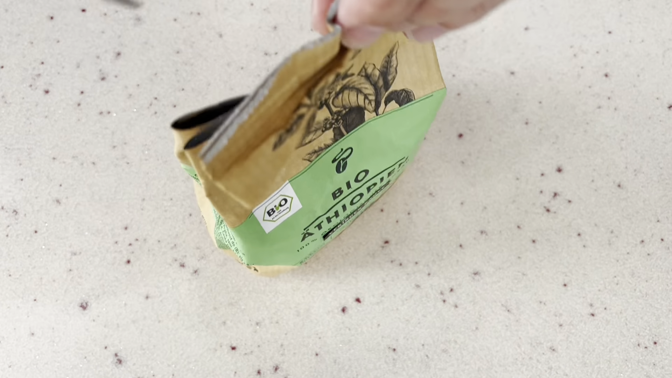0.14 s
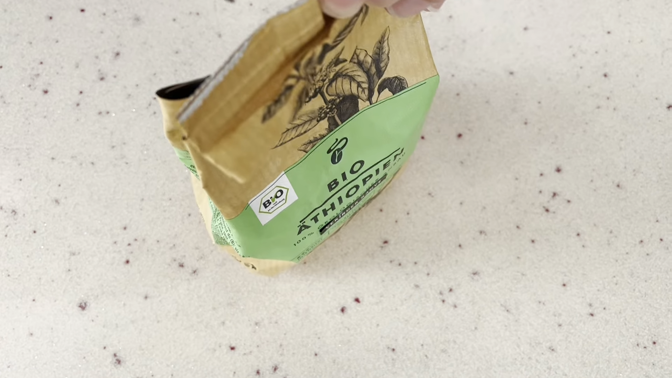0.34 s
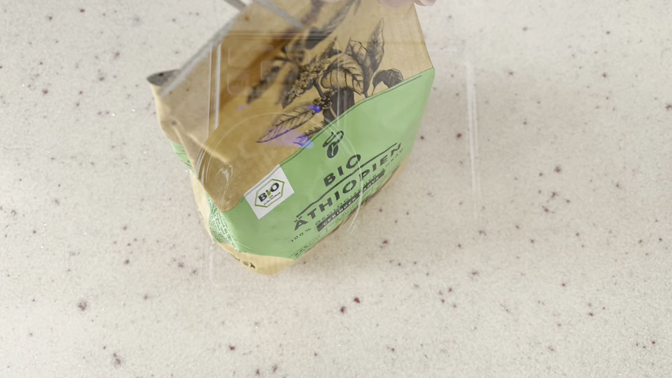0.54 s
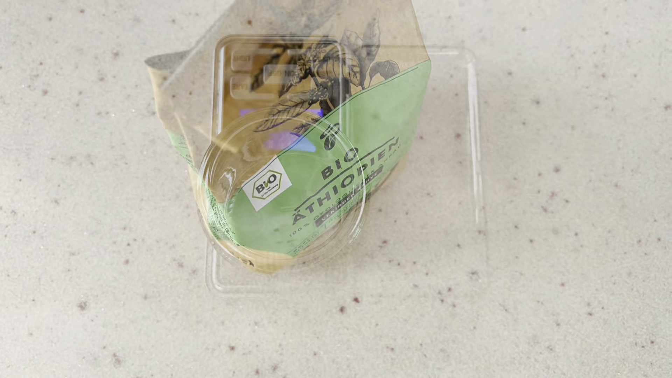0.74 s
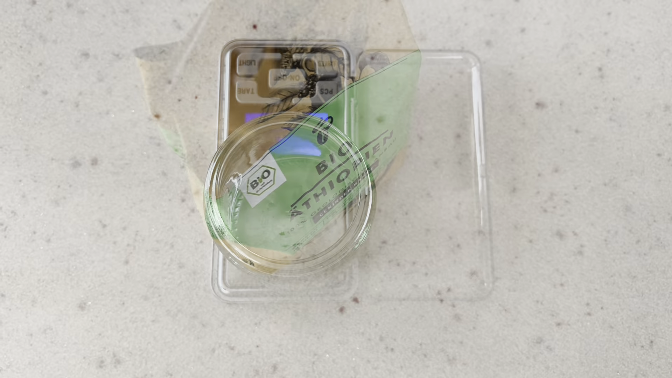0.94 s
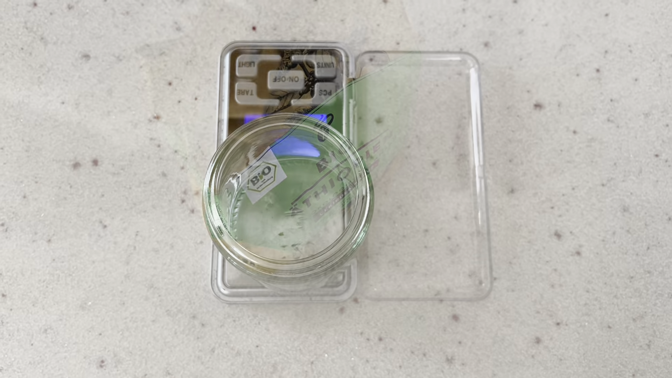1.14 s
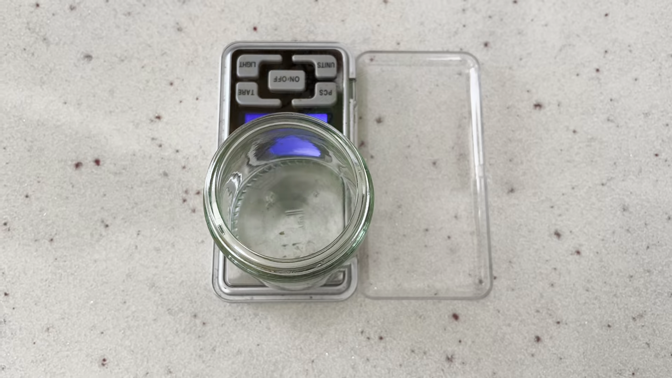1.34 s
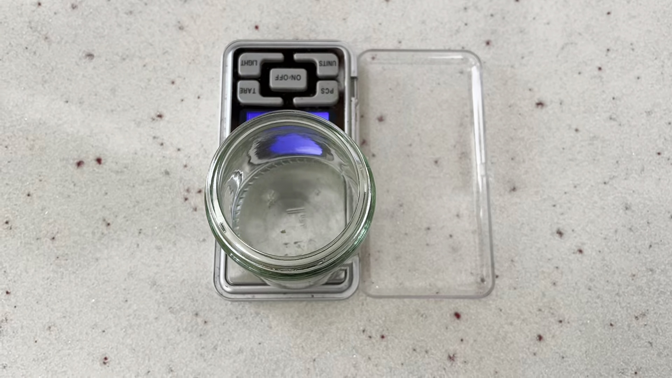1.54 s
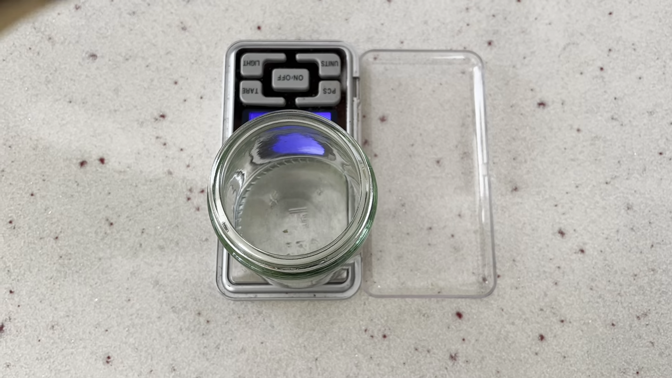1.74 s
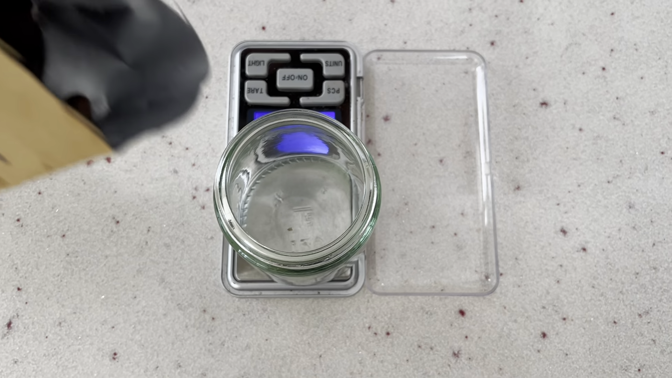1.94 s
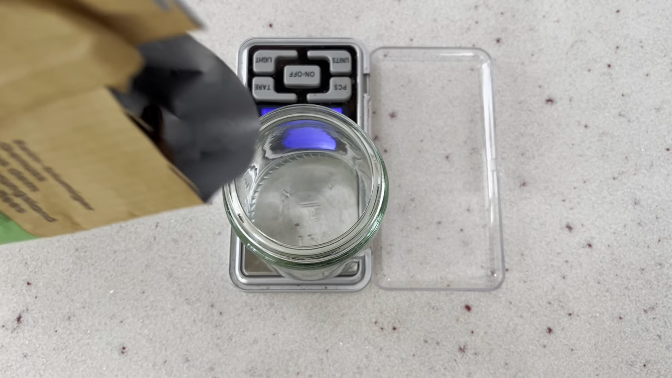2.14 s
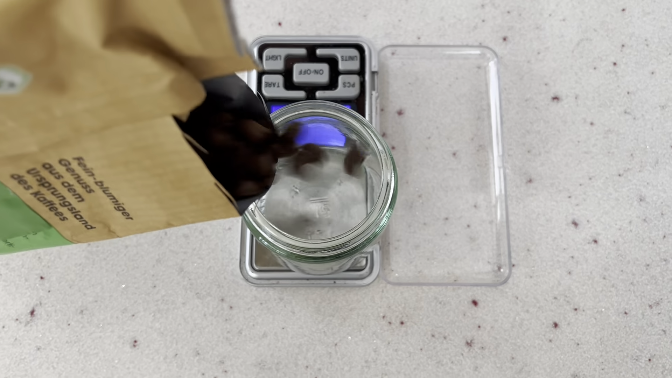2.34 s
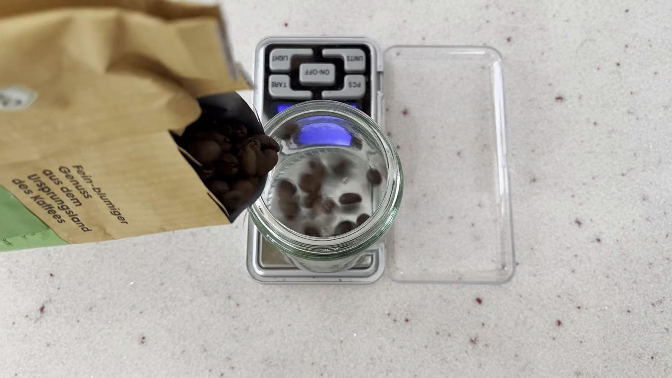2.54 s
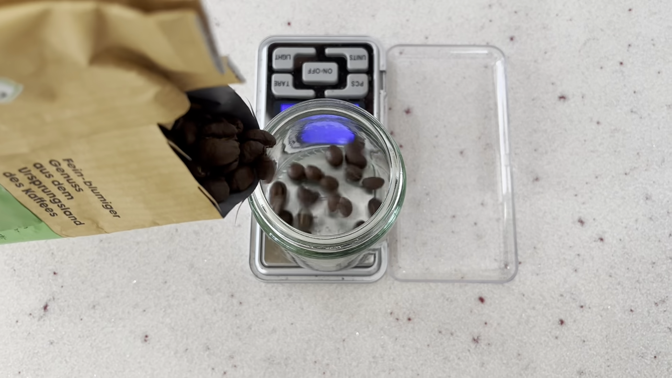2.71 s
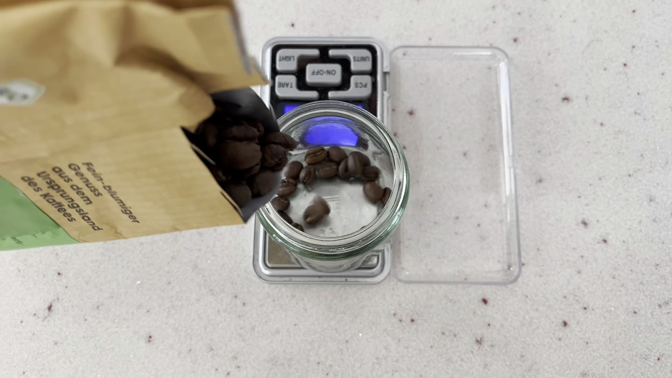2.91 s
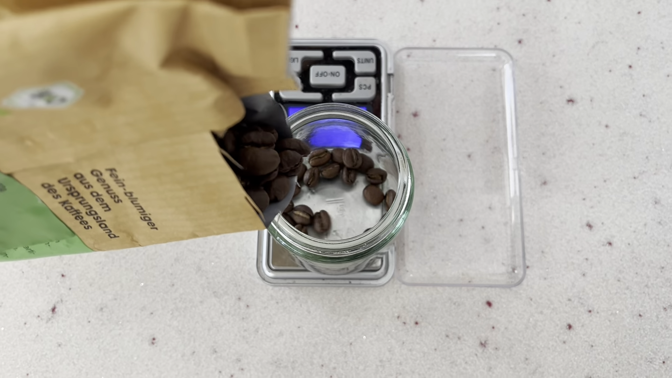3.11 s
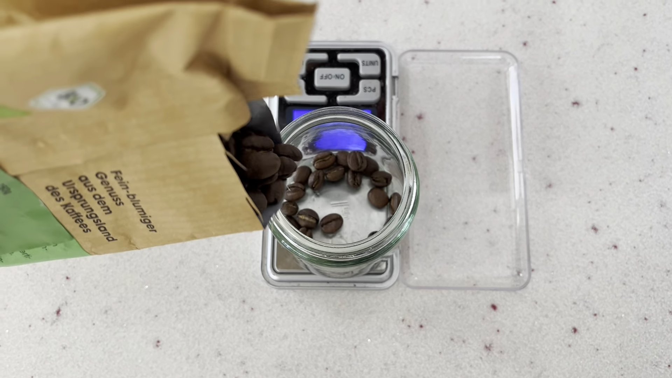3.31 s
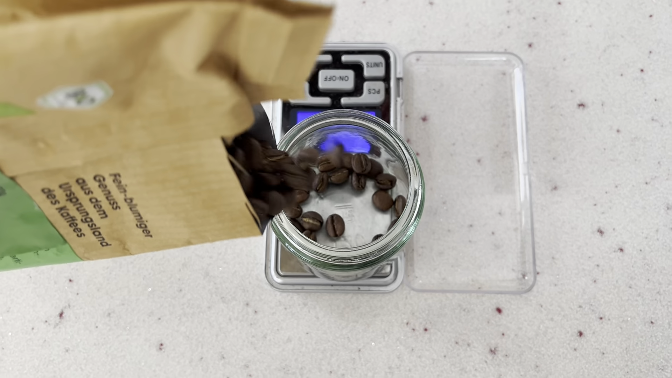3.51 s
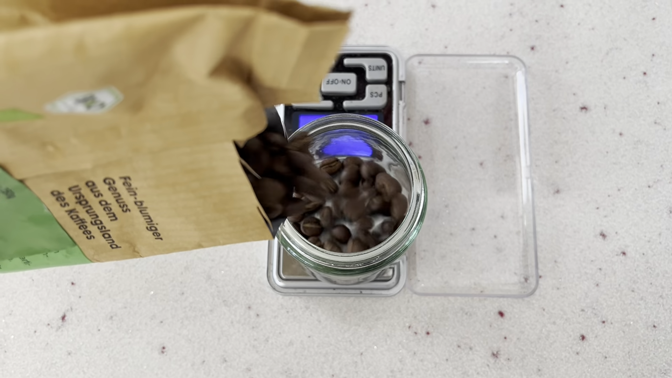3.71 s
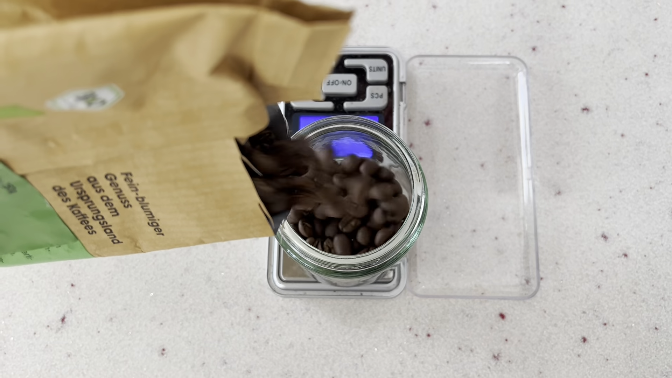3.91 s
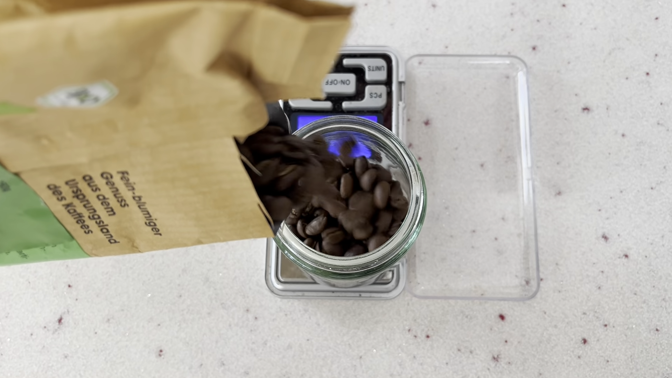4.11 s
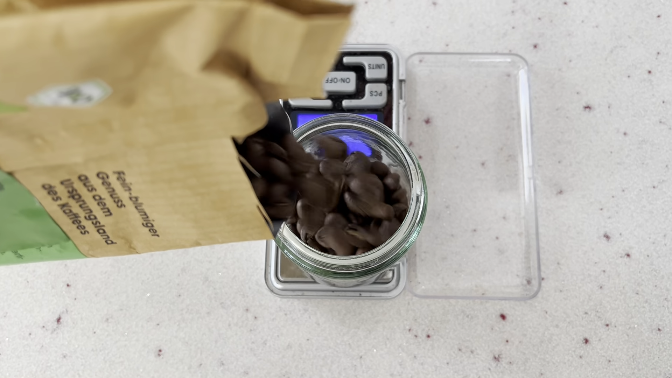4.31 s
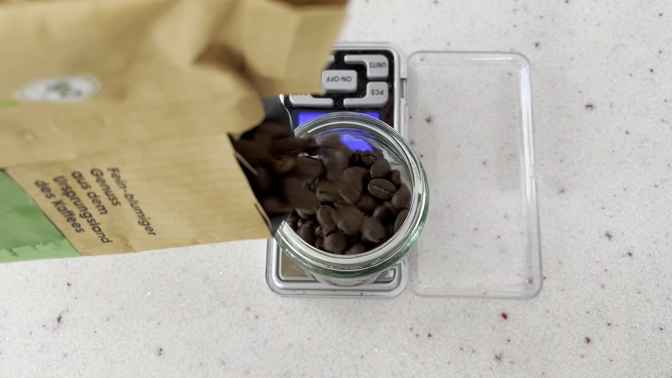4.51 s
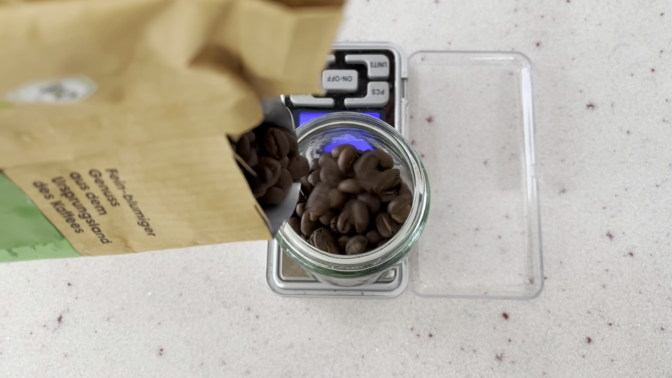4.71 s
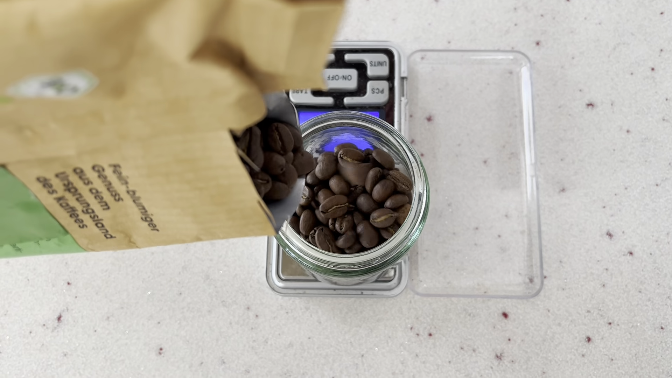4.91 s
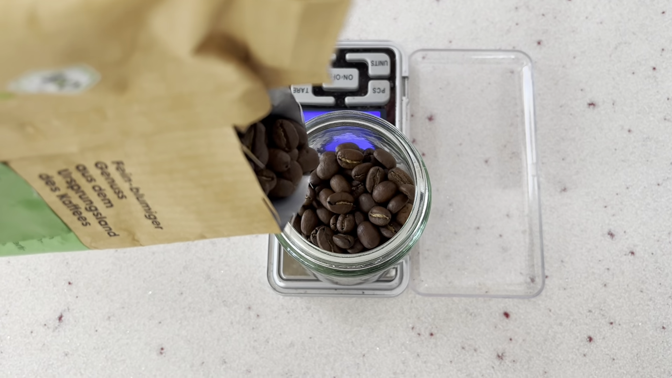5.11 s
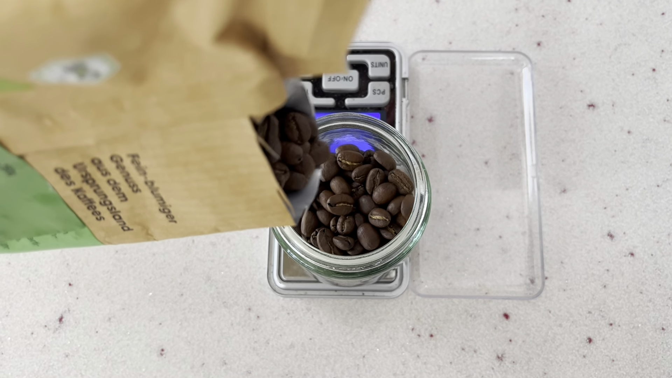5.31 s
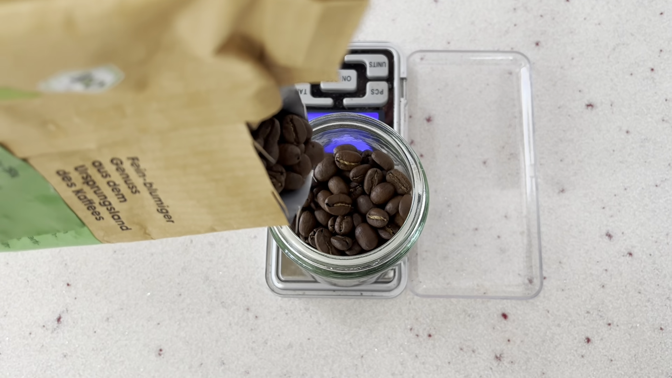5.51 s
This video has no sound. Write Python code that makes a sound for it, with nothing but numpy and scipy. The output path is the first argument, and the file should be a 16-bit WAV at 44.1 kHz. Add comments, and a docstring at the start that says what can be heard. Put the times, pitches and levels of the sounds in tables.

```python
"""Coffee beans into a glass jar

A paper bag of roasted beans is handled, lifted and tipped twice over a small jar, close to a stereo
microphone in a quiet kitchen. Paper crackles and slides in the bag are filtered noise and short ticks.
Beans landing are brittle clicks plus decaying modes of the glass; from about 4 s the heap covers the
glass, almost at once: the ring is choked and dry clicking is left. A short diffuse tail and a low
room tone surround it all.
"""
import sys
import numpy as np
from scipy import signal
from scipy.fft import rfft, irfft, next_fast_len
from scipy.io import wavfile
from scipy.ndimage import map_coordinates

SR = 44100
rng = np.random.default_rng(int(sys.argv[2]) if len(sys.argv) > 2 else 0)


def transcribe(u):
    """Save the signal u as a 16-bit wav file named by the first command-line argument.

    u: samples, shape (n,) or (channels, n), limited to [-1, 1]; the rate is SR.
    q: integer samples, one column per channel.
    """
    v = np.clip(np.atleast_2d(u).T, -1, 1)
    q = np.round(v * 32767).astype(np.int16)
    wavfile.write(sys.argv[1], SR, q)


N = 244755

# All levels and spectra below are relative: the sources and the mix set their own gains.
# hardest landings in the jar: start_s, click_level_db, glass_ring_level_db
LANDINGS = [(2.4069, -23.5, -24.5), (2.452, -16.5, -33), (2.4625, -19, -15), (2.4841, -12.5, -16),
            (2.5402, -13.5, -11.5), (2.5803, -21.5, -16), (2.642, -16.5, -17), (2.713, -25, -21),
            (2.7346, -23, -18), (2.759, -28, -19), (2.8529, -18.5, -13.5), (2.88, -28.5, -27),
            (2.9512, -27, -22), (3.01, -31.5, -28.5), (3.0512, -38, -31), (3.5575, -21.5, -19),
            (3.5811, -21.5, -20), (3.606, -18, -16.5), (3.6333, -17.5, -20), (3.642, -24.5, -10.5),
            (3.7148, -14.5, -17), (3.7417, -22.5, -13), (3.8195, -18, -17.5), (3.848, -15.5, -18.5),
            (3.8912, -25, -22), (3.9342, -19, -21.5), (3.9676, -20, -26), (4.0032, -21, -37),
            (4.0594, -16.5, -22), (4.1713, -24, -30.5), (4.2263, -21.5, -29.5), (4.261, -22.5, -41.5),
            (4.3079, -17, -48), (4.37, -16.5, -31), (4.5524, -19.5, -41), (4.6246, -19.5, -46),
            (4.6663, -29, -48.5), (4.7194, -22, -40), (4.785, -22.5, -61), (4.878, -42, -66),
            (4.9145, -31, -67), (4.9745, -30.5, -70), (5.0205, -37.5, -74)]
# beans striking the rim: start_s, ring_level_db
RIM_STRIKES = [(2.347, -36.5), (2.408, -37), (2.493, -45), (2.80, -50.5), (3.581, -45.5), (3.953, -47.5),
               (4.031, -44.5), (4.129, -41.5), (4.392, -40), (4.443, -39.5), (4.553, -45), (5.02, -56)]
# surges of beans falling into the jar: full_flow_s, rise_s, hold_s, t60_s, level_db
POURS = [(2.31, 0.11, 0.06, 0.25, -41), (2.48, 0.014, 0.31, .6, -46.5), (3.74, 0.11, 0.74, 0.24, -43.5),
         (4.62, 0.045, 0.092, 0.2, -46)]
# modes of the jar's bare wall: pitch_hz, level_db, t60_s
WALL_MODES = [(9077, 2, 0.12), (9000, -19.5, 0.043), (8840, -51, .04), (15400, -29, .02)]
# modes of the jar's rim: pitch_hz, level_db, t60_s
RIM_MODES = [(4243, 4, 0.15), (10500, -2, 0.15), (15530, -3, 0.087)]
# spectrum of bean clicks: frequency_hz, level_db_per_hz
BEAN_SPECTRUM = [(1000, -35), (3000, -11), (5000, -12), (6400, -16), (7500, -9.5), (9000, -5),
                 (11200, -1.5), (12000, -8), (12700, -11), (13800, -8), (15500, 5.5), (16100, -23),
                 (17000, -28.5)]
# slides in the bag: beans shifting as it is tipped, and a brief paper scuff at 0.85 s:
# full_flow_s, rise_s, hold_s, t60_s, level_db
SLIDES = [(0.14, 0.069, 0.1, 0.75, -58), (0.848, .016, .02, 0.18, -59), (1.43, 0.13, 0.048, 0.81, -36),
          (2.23, 0.16, 0.071, 1.0, -30), (3.68, 0.21, 1.03, .85, -44.5), (5.55, 0.021, 0.018, 0.25, -49.5)]
# spectrum of slides deep in the hollow bag: frequency_hz, level_db_per_hz
DEEP_SPECTRUM = [(50, -31.5), (130, -14.5), (290, -3), (420, -11.5), (680, -9.5), (930, -0.5), (1130, -0.5),
                 (1600, -8.5), (2500, -10), (4200, -14.5), (6400, -24), (10500, -17.5), (12800, -33.5),
                 (15500, -22)]
# spectrum of beans sliding out over the lip: frequency_hz, level_db_per_hz
LIP_SPECTRUM = [(50, -40), (160, -10), (330, 1), (470, -5), (720, -8), (1020, 3), (1550, -7), (2600, -10),
                (4200, -12), (5500, -15), (6500, -18.5), (11000, -21), (16000, -29)]
# creases of the bag snapping: start_s, peak_level_db, treble_level_db (against the peak)
SNAPS = [(0.0982, -37, -9), (0.1227, -28.5, 7.5), (0.1439, -32, -20), (0.192, -23.5, 2.5),
         (0.2274, -31, -2.5), (0.5709, -45.5, -25), (0.6581, -28, -12), (0.9674, -34.5, 3),
         (1.1129, -16, 6), (1.2527, -44, -14), (1.5594, -40, 7), (1.6518, -25.5, -12), (1.7324, -40.5, -3),
         (1.8295, -46.5, 9.5), (1.862, -39.5, 5), (1.911, -33.5, 9), (4.813, -24, 0)]
# fingers flexing the paper: full_grip_s, rise_s, hold_s, t60_s, level_db
GRIPS = [(0.02, 0.061, 0.28, .8, -66.5), (0.852, .018, .015, .2, -58), (0.965, 0.032, 0.026, .25, -59.5),
         (1.75, 0.062, 0.14, .3, -66), (2.04, 0.028, 0.016, 0.15, -52), (5.42, 0.16, 0.13, .3, -72)]
# clumps of beans bumping the bag wall: start_s, peak_level_db
BUMPS = [(1.112, -24), (1.335, -20), (1.42, -18), (1.456, -15), (1.497, -9), (1.522, -21), (1.996, -12),
         (2.163, -14), (4.876, -32), (4.915, -34), (5.392, -44)]
# dull knocks on the bag or the jar's stand: start_s, peak_level_db
THUDS = [(0.19, -52), (1.112, -42), (1.497, -30), (2.853, -29.5), (4.786, -34)]
# the bag's foot scraping the worktop: full_speed_s, rise_s, hold_s, t60_s, level_db
RUBS = [(0.66, .03, 0.066, 1, -59)]
# spectrum of crackling paper: frequency_hz, level_db_per_hz
PAPER_SPECTRUM = [(50, -57), (150, -1.5), (400, 0), (750, -3), (1300, 1), (2300, -3), (4800, -1.5),
                  (6400, -9.5), (8000, -1), (11000, -16.5), (12700, -19.5), (15000, -17.5), (17000, -45.5)]
# spectrum of a snap's sharp top: frequency_hz, level_db_per_hz
CREASE_SPECTRUM = [(2000, -18), (5000, -16), (8500, 2), (11000, 8.5), (12700, -14.5), (15000, 7.5),
                   (17000, -27)]
# spectrum of a bump: frequency_hz, level_db_per_hz
BUMP_SPECTRUM = [(50, -39.5), (130, -27.5), (300, -1), (650, -11), (950, 9.5), (1500, -1), (2500, -3.5),
                 (4500, -7.5), (7000, -15), (16000, -20)]
# spectrum of a thud: frequency_hz, level_db_per_hz
THUD_SPECTRUM = [(20, -32.5), (60, -11), (100, -1.5), (330, -2), (700, -12), (1300, -18), (3300, -10),
                 (6000, -22), (16000, -50)]
# spectrum of the scrape: frequency_hz, level_db_per_hz
RUB_SPECTRUM = [(200, -36), (390, -6), (450, 3.5), (520, -12.5), (850, -13), (1500, -26.5)]
# kitchen reverberation: frequency_hz, t60_s
KITCHEN_DECAY = [(200, 0.311), (2000, 0.15), (8000, 0.096), (15000, 0.015)]
# spectrum of the room tone: frequency_hz, level_db_per_hz
ROOM_SPECTRUM = [(15, -49.5), (28, -26.5), (48, -3.5), (70, -9), (104, -8), (135, -15.5), (290, -16.5),
                 (370, -26), (620, -26), (1030, -33), (2500, -42.5), (5000, -44.5), (10000, -62),
                 (13000, -76)]
# stereo balance of the bag: frequency_hz, left_minus_right_db
BAG_LEAN = [(100, -0.5), (380, 0.5), (700, 6), (1300, 3.5), (2400, 1), (4400, 3), (8000, -1)]
# stereo likeness of the bag: frequency_hz, left_right_likeness (-1 to 1)
BAG_ALIKE = [(60, 1), (300, 1), (700, 0.86), (1400, 0.41), (2500, 1), (4400, 0.54), (9000, 0.037)]
# stereo likeness of the clicks in the jar: frequency_hz, left_right_likeness (-1 to 1)
CLICK_ALIKE = [(3000, 0.18), (8000, 0.5), (11000, -0.2), (15000, -0.69)]
# stereo likeness of the room tone: frequency_hz, left_right_likeness (-1 to 1)
ROOM_ALIKE = [(60, 1), (300, 0.87), (1000, 0.23), (4000, 0.074)]

TOP_HZ = 16400  # band limit
SAG_DB_PER_S = 1  # a held movement slowly loses strength
BOUNCE_S, BOUNCE_DB = 0.016, -11  # a bean's hop: mean flight, second contact against the first
COVER_START_S, COVER_FULL_S = 4, 4.03  # the heap covers the glass, almost at once
COVER_LOSS_DB = 15  # a full heap shields the wall from the lesser landings
COVER_DB_PER_S = 372  # extra decay of the wall's ring under a full heap
CHECK_DB = -17.5  # a landing this hard fully checks the old vibration
CLUMPS_PER_S, CLUMP_DB = 44, 4  # beans move in clumps, so their flow flutters
STRAY_CLICK_DB, STRAY_RING_DB = 15.5, 17.5  # lesser landings against the stream's level
STRAY_SCATTER_DB = 3
DRY_DB = -64.5  # a stream weaker than this drops no more beans


def clicks(landed):
    """Hard, light beans click on glass and on each other, each at its own pitches."""
    hits = np.zeros((2, N))
    for s, click_db, _ in landed:
        add(hits, s, amp(click_db + 2) * tick(7000, 16000, t60=.007, count=8))
        # a sharp first crack, then the jostled neighbours
        crack = burst(t60=.003) + amp(-13) * burst(t60=.03)
        add(hits, s, amp(click_db - 5) * crack)
    voices = [tick(4000, 16500, t60=.006, count=9) for _ in range(80)]
    stream = shower(voices, scatter_db=23, count=1350)
    # skittering beans fill the gaps between the clicks
    rattle = stream + amp(-7) * grains(rate=1200, scatter_db=4, t60=.006)
    pouring = amp(4) * level(POURS) * clumping() * rattle
    return colour(hits + pouring, BEAN_SPECTRUM)


def jar(landed):
    """Each landing starts a new vibration and a hard one checks the old; the heap damps the wall."""
    wall, rim = np.zeros(N), np.zeros((2, N))
    t = np.arange(SR // 3) / SR
    check = 0.19 + .55 * np.exp(-t / 0.00058)
    for s, _, ring_db in sorted(landed):
        force = min(1, amp(ring_db - CHECK_DB))
        ringing = wall[round(s * SR):][:len(t)]
        ringing *= check[:len(ringing)] ** force
        damping_db = COVER_DB_PER_S * cover(s) * t
        add(wall, s, amp(ring_db + 3 - damping_db) * ring(WALL_MODES, scatter_db=9))
    for s, db in RIM_STRIKES:
        # the rim flexes in lobes, so each side hears its own strength
        side_db = rng.normal(0, 1.4, (2, 1))
        add(rim, s, amp(db - 1 + side_db) * ring(RIM_MODES, scatter_db=2))
    # the stream keeps brushing the rim
    brush = level(POURS) * grains(rate=400, scatter_db=3, t60=.002)
    voice = ring(RIM_MODES, scatter_db=0)
    sing = signal.fftconvolve(brush, voice[None] / np.linalg.norm(voice), axes=1)[:, :N]
    return wall + rim + amp(-4.5) * sing


def contacts(count):
    """Rows (start_s, click_db, ring_db): hard landings, their hops, and count that follow the stream."""
    rows = []
    for (s, click_db, ring_db), chance in zip(LANDINGS, rng.random(len(LANDINGS))):
        rows.append((s, click_db, ring_db))
        hop_s = BOUNCE_S * (.5 + chance)
        rows.append((s + hop_s, click_db + BOUNCE_DB, ring_db + BOUNCE_DB))
    flow_db = 20 * np.log10(level(POURS) + 1e-9)
    flow_db = np.where(flow_db > DRY_DB, flow_db, -120)
    first, last = LANDINGS[0][0], LANDINGS[-1][0]
    times = first + (last - first) * (np.arange(count) + rng.random(count)) / count
    scatter = STRAY_SCATTER_DB * np.clip(rng.standard_normal((count, 2)), -2, 2)
    for s, (click_db, ring_db) in zip(times, scatter):
        db = flow_db[round(s * SR)]
        shielded_db = ring_db - COVER_LOSS_DB * cover(s)
        rows.append((s, db + STRAY_CLICK_DB + click_db, db + STRAY_RING_DB + shielded_db))
    return rows


def cover(s):
    """How far the heap covers the jar's wall, 0 to 1."""
    return np.interp(s, [COVER_START_S, COVER_FULL_S], [0, 1])


def clumping():
    """A gain that flutters at random as beans jam and come loose."""
    knots = rng.standard_normal(1000)
    place = np.arange(N) * CLUMPS_PER_S / SR
    return unit(amp(CLUMP_DB * map_coordinates(knots, [place], mode="wrap")))


def sliding():
    """Beans shift and paper scuffs in the hollow bag; its boom thins as beans run out over the lip."""
    at_lip = np.interp(np.arange(N) / SR, [2.35, 2.7], [0, 1])
    # each patch of paper answers a tap with its own pitches
    patches = [tick(100, 16000, t60=.018, count=26) for _ in range(60)]
    taps = shower(patches, scatter_db=21, count=2600)
    slides = level(SLIDES) * unit(taps + amp(-1) * grains(rate=610, scatter_db=1, t60=0.011))
    deep = colour(slides * np.sqrt(1 - at_lip), DEEP_SPECTRUM)
    shallow = colour(slides * np.sqrt(at_lip), LIP_SPECTRUM)
    return amp(-1) * deep + amp(1.5) * shallow


def bag():
    """Paper crackles and snaps; beans bump its wall; dull knocks sound; its foot rubs the worktop."""
    snaps, crisp, bumps, thuds = np.zeros((4, 2, N))
    for s, db, treble_db in SNAPS:
        add(snaps, s, amp(db - 7.5) * burst(t60=0.035))
        add(crisp, s, amp(db + treble_db - 11.5) * burst(t60=0.00934))
    for s, db in BUMPS:
        add(bumps, s, amp(db + 3) * knock(t60=.022, blur_db=-13))
    for s, db in THUDS:
        add(thuds, s, amp(db + 17) * knock(t60=0.03, blur_db=-21.5))
    crackle = amp(2) * level(GRIPS) * grains(rate=260, scatter_db=5, t60=.012)
    rub = amp(-2) * level(RUBS) * grains(rate=300, scatter_db=2, t60=.02)
    paper = colour(snaps + crackle, PAPER_SPECTRUM) + colour(crisp, CREASE_SPECTRUM)
    blows = colour(bumps, BUMP_SPECTRUM) + colour(thuds, THUD_SPECTRUM)
    return paper + blows + colour(rub, RUB_SPECTRUM)


def kitchen(x):
    """The kitchen answers with a short diffuse tail: noise that dies at its own pace in each band."""
    hz, t, z = signal.stft(rng.standard_normal((2, SR // 2)), SR, nperseg=256)
    fade = amp(-60 * t / along(KITCHEN_DECAY, hz)[:, None])
    tail = signal.istft(z * fade, SR, nperseg=256)[1]
    tail = np.pad(tail, ((0, 0), (SR // 300, 0)))  # the tail starts a little late
    tail *= amp(-14) / np.linalg.norm(tail[0])
    return signal.fftconvolve(x, tail, axes=1)[:, :N]


def quiet_room():
    """Steady room tone: noise coloured mostly low, alike on both sides only in the bass."""
    noise = rng.standard_normal((2, N))
    return amp(-56.5) * spread(colour(noise, ROOM_SPECTRUM, size=16384), ROOM_ALIKE)


def ring(modes, scatter_db):
    """A struck glass: the first mode is steady, the others vary with the spot that is hit."""
    t = np.arange(SR // 3) / SR
    hz, db, t60 = np.transpose(modes)[:, :, None]
    vary = scatter_db * rng.standard_normal(db.shape) * (np.arange(len(db)) > 0)[:, None]
    swell = 1 - np.exp(-t / .0005)
    return swell * np.sum(amp(db + vary - 60 * t / t60) * np.sin(2 * np.pi * hz * t), axis=0)


def tick(low_hz, high_hz, t60, count):
    """A small brittle thing rings briefly with a few pitches of its own."""
    t = np.arange(SR // 40) / SR
    steps = (np.arange(count) + rng.random(count))[:, None] / count
    hz = low_hz + (high_hz - low_hz) * steps
    swing = np.exp(2j * np.pi * hz * t)
    weights = rng.standard_normal((2, count)) + 1j * rng.standard_normal((2, count))
    return (2 * weights / np.linalg.norm(weights) @ swing).real * amp(-60 * t / t60)


def burst(t60):
    """One short contact: a decaying pair of noises."""
    t = np.arange(SR // 8) / SR
    return rng.standard_normal((2, len(t))) * amp(-60 * t / t60)


def knock(t60, blur_db):
    """One solid push, shared by both sides, and a short looser jostle."""
    sound = amp(blur_db) * burst(t60)
    sound[0, 0] += 1  # spread() takes the first signal as the middle
    return sound


def grains(rate, scatter_db, t60):
    """Random tiny contacts, rate a second, of scattered size; rms 1."""
    sizes = (rng.random(N) < rate / SR) * amp(scatter_db * np.clip(rng.standard_normal(N), -2, 2))
    decay = amp(-60 * np.arange(SR // 20) / SR / t60)
    power = np.abs(signal.fftconvolve(sizes ** 2, decay ** 2)[:N])
    return unit(np.sqrt(power) * rng.standard_normal((2, N)))


def shower(voices, scatter_db, count):
    """Count contacts at random moments, each one of the voices at a scattered size; rms 1."""
    track = np.zeros((2, N))
    for when, which, size in rng.random((count, 3)):
        voice = voices[int(which * len(voices))]
        add(track, when * N / SR, amp(scatter_db * size) * voice)
    return unit(track)


def level(moves):
    """Gain per sample of movements that swell, hold with a slight sag and die away."""
    t = np.arange(N) / SR
    gain = np.zeros(N)
    for s, rise, hold, t60, db in moves:
        swell = np.exp(-(np.minimum(t - s, 0) / rise) ** 2)
        sag_db = SAG_DB_PER_S * np.maximum(t - s, 0)
        fade_db = 60 * np.maximum(t - s - hold, 0) / t60
        gain += swell * amp(db - sag_db - fade_db)
    return gain


def colour(x, spectrum, size=2048):
    """Causal (minimum-phase) filter of unit energy with the given spectrum."""
    cepstrum = irfft(np.log(amp(along(spectrum, np.fft.rfftfreq(size, 1 / SR)))))
    # folding the cepstrum forward puts the energy as early as possible
    cepstrum[1:size // 2] *= 2
    cepstrum[size // 2 + 1:] = 0
    response = irfft(np.exp(rfft(cepstrum)))
    return signal.fftconvolve(x, response[None] / np.linalg.norm(response), axes=1)[:, :N]


def spread(pair, alike, lean=((1000, 0),), lead=0):
    """Two signals, as middle and side, become left and right; lead is the left's head start in seconds."""
    m = next_fast_len(N + SR // 4)
    hz = np.fft.rfftfreq(m, 1 / SR)
    turn = np.arccos(np.clip(along(alike, hz), -.99, .99)) / 2
    mid, side = rfft(pair, m) * [np.cos(turn), np.sin(turn)]
    left = amp(along(lean, hz) / 2) * np.exp(1j * np.pi * hz * lead)
    return irfft([(mid + side) * left, (mid - side) / left], m)[:, :N]


def add(track, s, sound):
    """Mix a sound into a track at s seconds."""
    start = max(0, round(s * SR))
    part = track[..., start:start + sound.shape[-1]]
    part += sound[..., :part.shape[-1]]


def along(points, hz):
    """Interpolate (frequency_hz, value) points on a log frequency axis."""
    f, v = np.transpose(points)
    return np.interp(np.log(hz + 1), np.log(f + 1), v)


def amp(db):
    """Decibels to amplitude."""
    return 10 ** (np.asarray(db) / 20)


def unit(x):
    """Scale to rms 1."""
    return x / np.sqrt(np.mean(x ** 2) + 1e-20)


def scene():
    """Bag to the left, jar in the middle, both close up in the kitchen."""
    landed = contacts(count=190)
    beans = spread(clicks(landed), CLICK_ALIKE)
    glass = jar(landed)
    paper = spread(bag() + sliding(), BAG_ALIKE, BAG_LEAN, lead=.00007)
    # the room gets more of the clicks and less of the glass than the direct sound has
    sent_to_room = paper + amp(6.5) * beans + amp(-13) * glass
    return paper + beans + glass + kitchen(sent_to_room) + quiet_room()


def record(dry):
    """Nothing is kept above the band limit."""
    m = next_fast_len(N + SR // 4)
    kept = np.fft.rfftfreq(m, 1 / SR) < TOP_HZ
    return irfft(rfft(dry, m) * kept, m)[:, :N]


dry = scene()
out = record(dry)
transcribe(out)
```